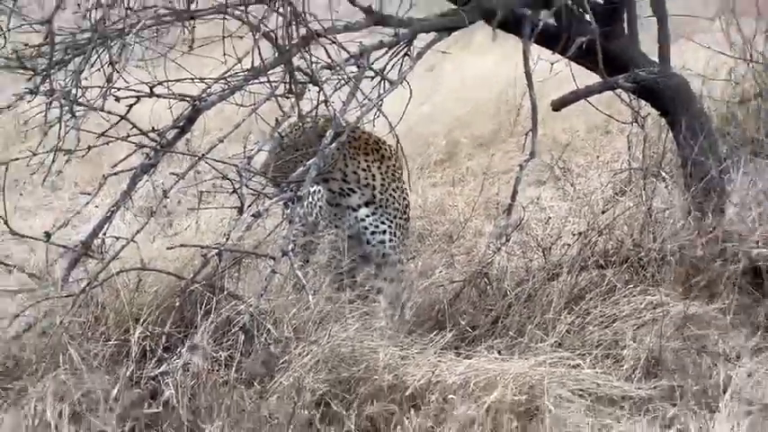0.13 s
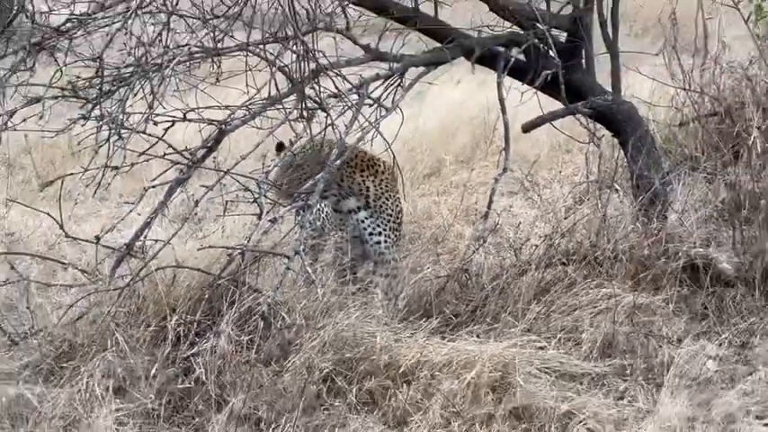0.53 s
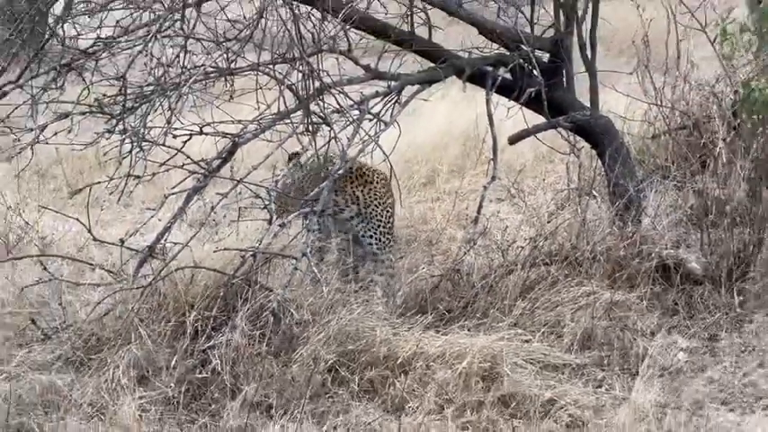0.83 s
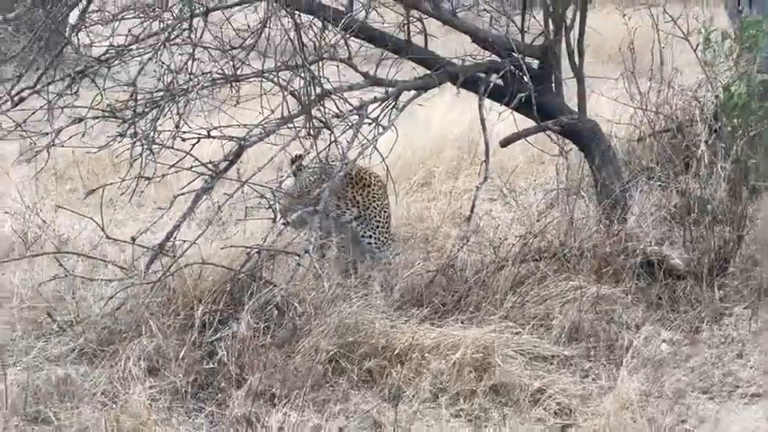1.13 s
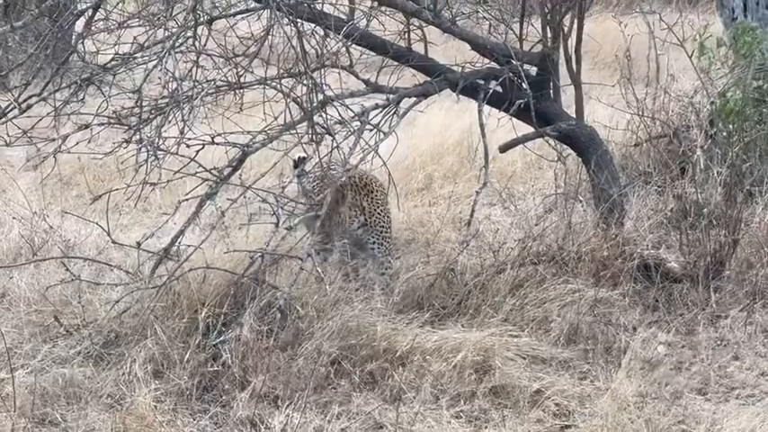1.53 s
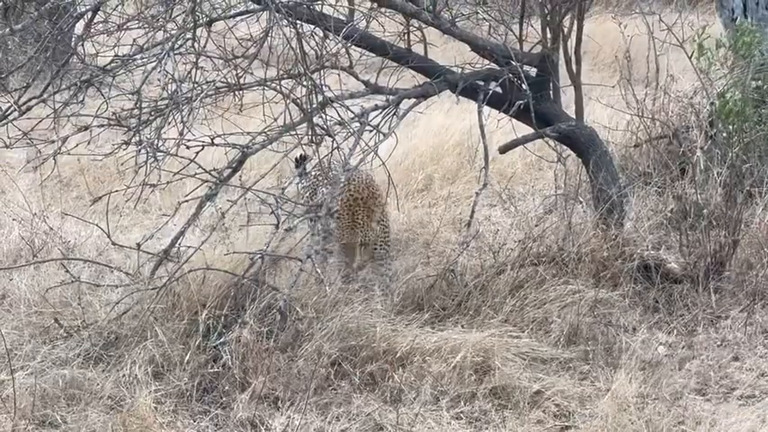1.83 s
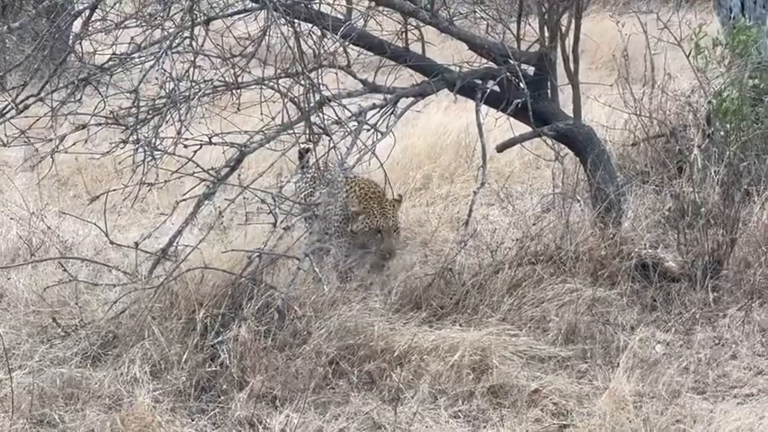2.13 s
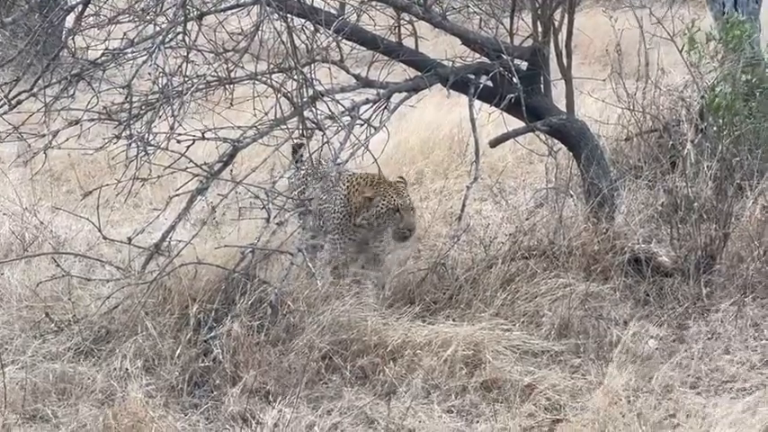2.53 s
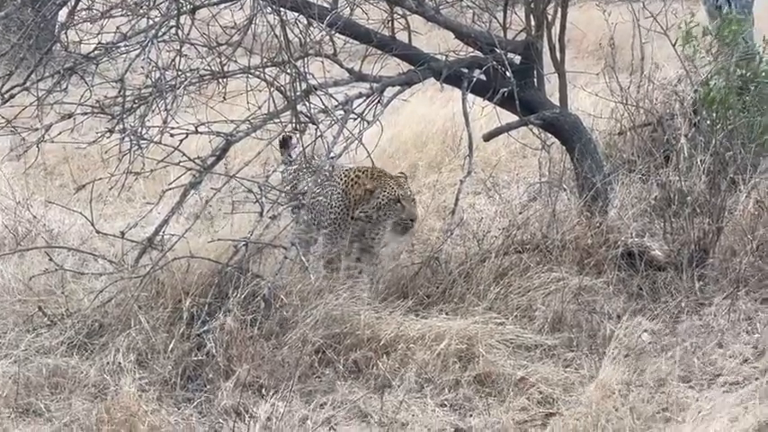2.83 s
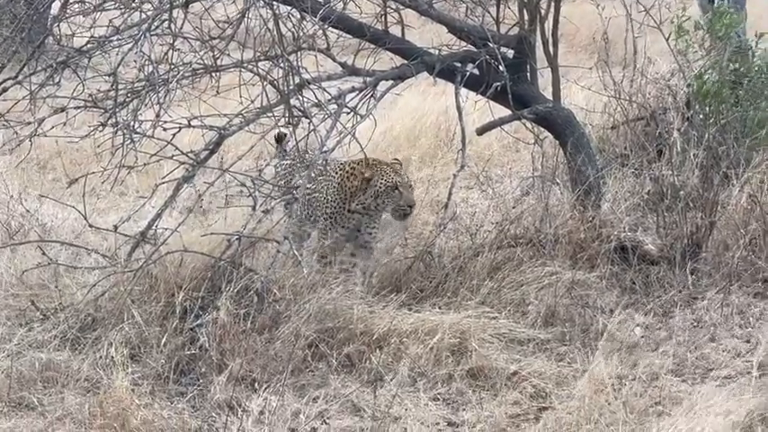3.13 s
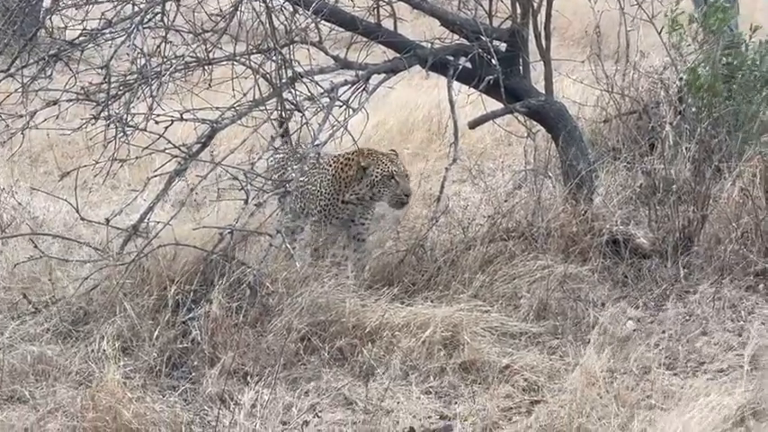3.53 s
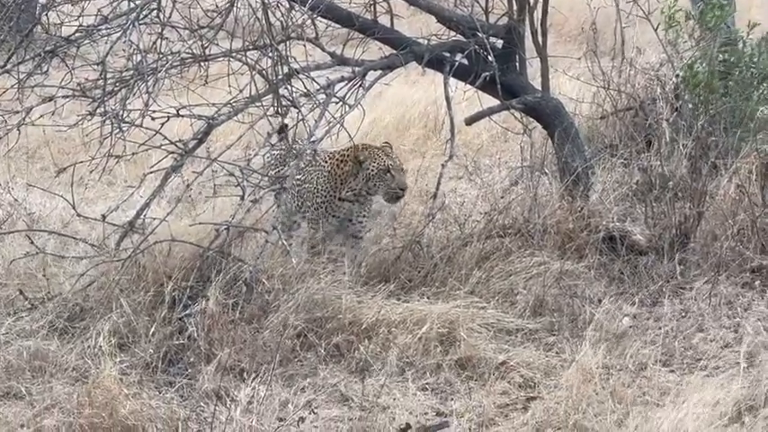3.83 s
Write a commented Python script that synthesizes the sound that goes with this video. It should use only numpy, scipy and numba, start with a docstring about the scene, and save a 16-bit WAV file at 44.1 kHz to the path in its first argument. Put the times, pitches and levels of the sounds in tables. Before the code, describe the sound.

A leopard gives a low grunt, then five harsh sawing rasps, each led in by a quieter rattling inhale. Wind rumbles on the microphone in quiet open bush and buffets it hard at the end.

```python
"""Leopard sawing in dry open bush

An opening grunt is followed by five harsh outward rasps, each led in by a slow rattling in-stroke.
Every stroke is a train of larynx flaps: a flap rings the deep throat cavity, thumps the chest and
lets a puff of air through the resonances of the mouth. Faint air and brushes of dry grass lie behind.
Wind rumbles on the microphone and buffets it hard in the last half second."""
import sys
import numpy as np
from scipy import signal
from scipy.fft import rfft, irfft
from scipy.io import wavfile
from scipy.ndimage import uniform_filter1d
from numba import njit

SR = 44100
rng = np.random.default_rng(int(sys.argv[2]) if len(sys.argv) > 2 else 0)


def wav_record(signal):
    """Record a signal, one row per channel, as 16-bit PCM in the file named by sys.argv[1]."""
    frames = np.transpose(np.atleast_2d(signal))
    bounded = np.clip(frames, -1, 1)
    # unit amplitude maps onto the largest positive 16-bit level
    quanta = np.round(bounded * 32767).astype(np.int16)
    wavfile.write(sys.argv[1], SR, quanta)


N = 176400
TIME = np.arange(N) / SR
BIN_HZ = np.arange(N // 2 + 1) * SR / N


def from_db(db):
    """Amplitude ratio of a level: a factor of ten for every 20 dB."""
    return 10 ** (np.asarray(db) / 20)


def unit_rms(x):
    """Normalisation to unit mean power."""
    return x / np.sqrt(np.mean(x ** 2) + 1e-20)


def colour(x, spectrum):
    """Spectral shaping by (f/Hz, level/dB) points, conserving the power of white noise."""
    hz, db = np.transpose(spectrum)
    gain = from_db(np.interp(np.log(BIN_HZ + 1e-3), np.log(hz), db))
    return irfft(rfft(x) * unit_rms(gain), N)


def stereo_noise(spectrum, side_db):
    """Partial coherence: the channels share one noise and carry a weaker one in antiphase."""
    mid, side = colour(rng.standard_normal((2, N)), spectrum)
    return mid + from_db(side_db) * side * [[1], [-1]]


def grassland():
    """Ambient noise: faint steady air, and the friction of dry grass in brief Gaussian swells."""
    # spectra of the air and of brushed grass: f/Hz, level/dB
    air = [(100, -5), (160, -1.5), (330, -1), (620, -2), (1300, -5), (2000, -5.5), (3200, -18.5),
           (5000, -25.5), (8400, -30.5), (11000, -47), (15000, -43.5)]
    grass = [(1000, -18), (3500, -4.5), (5800, 3.5), (7500, -5.5), (8700, -1.5), (11000, -24.5),
             (15000, -16.5)]
    # brushes of the grass: t/s, standard width/s, level/dB
    rustles = [(.05, 0.065, -67.5), (0.918, 0.013, -64.5), (1.412, 0.031, -68), (2.468, 0.046, -65.5),
               (3.021, 0.028, -63.5)]
    brushes = sum(from_db(db) * np.exp(-((TIME - at) / width) ** 2 / 2) for at, width, db in rustles)
    return from_db(-59) * stereo_noise(air, side_db=-2.5) + brushes * stereo_noise(grass, side_db=-14.5)


def eddies(spectrum, window):
    """Turbulent pressure: coloured noise, its power evened over a window given in samples."""
    noise = stereo_noise(spectrum, side_db=-14)
    return noise / np.sqrt(uniform_filter1d(np.mean(noise ** 2, axis=0), size=window))


def buffet(at, db, fall_s, rise_s=0.00048):
    """Envelope of a pressure transient: fast exponential growth, slower exponential decay."""
    return from_db(db) * np.exp(-np.logaddexp((at - TIME) / rise_s, (TIME - at) / fall_s))


def wind():
    """Turbulence at the microphone: rumble and flutter follow the gusts; hard buffets saturate softly."""
    # course of the gusts: t/s, level/dB
    gusts = [(0.0, -46), (0.04, -46.5), (0.13, -61), (0.7, -44.5), (0.72, -63), (1.29, -36), (1.37, -44),
             (1.84, -32), (1.94, -46), (2.08, -42), (2.26, -38.5), (2.31, -36.5), (2.42, -41.5),
             (2.65, -26), (2.7, -40), (2.87, -32), (3.03, -41), (3.4, -36.5), (3.55, -23), (3.59, -14.5),
             (3.78, -19), (3.81, -36), (3.85, -15.5), (3.9, -28.5), (3.93, -15.5), (4.0, -21.5)]
    # hard buffets: t/s, thud level/dB, slap level/dB
    buffets = [(3.583, -10, -29.5), (3.608, -7.5, -5), (3.638, -10, -14.5), (3.663, -15, -23.5),
               (3.674, -10.5, -11), (3.708, -9, -16.5), (3.741, -6, -20.5), (3.783, -16.5, -20),
               (3.796, -3.5, -22.5), (3.817, -4.5, -11), (3.86, -5, -9), (3.913, -9, -11),
               (3.926, -19.5, -18), (3.961, -1.5, -18)]
    # spectra of the low rumble, the higher flutter and a buffet's thud and slap: f/Hz, level/dB
    rumble_spectrum = [(20, -30), (30, -13), (40, -11.5), (52, -4), (90, -1), (140, -14), (220, -30.5),
                       (500, -47.5), (1000, -76)]
    flutter_spectrum = [(60, -10), (130, 9.5), (220, 2.5), (450, -8.5), (1000, -39.5), (2500, -73.5)]
    thud_spectrum = [(40, -12.5), (120, 4.5), (220, -3), (400, -7.5), (800, -34.5), (2000, -67)]
    slap_spectrum = [(150, -24.5), (300, 5), (480, 12.5), (700, -3), (1000, -9.5), (1400, -42), (2000, -37),
                     (2800, -72.5), (6000, -63.5)]
    thud_fall_s, slap_fall_s = 0.014, 0.0075
    gust_db = np.interp(TIME, *np.transpose(gusts))
    rumble = eddies(rumble_spectrum, window=2000) * from_db(gust_db + 3.5)
    flutter = eddies(flutter_spectrum, window=1200) * from_db(0.97 * gust_db - 5.5)
    thud_envelope = sum(buffet(at, db, thud_fall_s) for at, db, _ in buffets)
    slap_envelope = sum(buffet(at, db, slap_fall_s) for at, _, db in buffets)
    slap_envelope += buffet(at=0.609, db=-39.5, fall_s=slap_fall_s)  # a soft bump before the grunt
    thuds = eddies(thud_spectrum, window=600) * thud_envelope
    slaps = eddies(slap_spectrum, window=300) * slap_envelope
    port_low_cut = signal.butter(2, 34.5, "high", fs=SR, output="sos")
    pressure = signal.sosfilt(port_low_cut, rumble + flutter + thuds + slaps)
    overloaded = 1.1 * np.tanh(pressure / 1.1)
    return signal.sosfilt(signal.butter(2, 2500, fs=SR, output="sos"), overloaded)


def bush(x, tail_db=-16, t60_s=0.18, balance_db=0.6):
    """Scattering by trunks and grass adds a short dull tail; a phase difference spreads the treble."""
    # side signal relative to the mid signal: f/Hz, level/dB
    spread = [(100, -9), (500, -19.5), (1200, -12.5), (2500, -9), (4500, -22.5), (6500, -13), (8500, 0),
              (15000, -1)]
    t = TIME[:SR // 2]
    scatter = rng.standard_normal(len(t)) * from_db(-60 * t / t60_s) * (t > 0.008)
    scatter = signal.sosfilt(signal.butter(1, 11000, fs=SR, output="sos"), scatter)
    mid = x + from_db(tail_db) * signal.fftconvolve(x, scatter / np.sqrt(np.sum(scatter ** 2)))[:N]
    side_gain = from_db(np.interp(BIN_HZ, *np.transpose(spread)))
    side = irfft(1j * rfft(mid) * side_gain, N)  # in quadrature with the mid signal
    return np.array([mid + side, mid - side]) * from_db([[balance_db / 2], [-balance_db / 2]])


@njit
def moving_resonance(x, angle, r):
    """Two-pole resonator of unit peak gain, with pole radius r and a moving centre in rad/sample."""
    y = np.zeros(len(x))
    for i in range(2, len(x)):
        drive = (1 - r * r) / 2 * (x[i] - x[i - 2])
        y[i] = drive + 2 * r * np.cos(angle[i]) * y[i - 1] - r * r * y[i - 2] + 1e-18
    return y


def formants(x, modes, tuning):
    """Parallel resonances of alternating sign glide together, roughly conserving white-noise power."""
    total, power = 0, 0
    for k, (hz, bandwidth, db) in enumerate(modes):
        r = np.exp(-np.pi * bandwidth / SR)
        total = total + (-1) ** k * from_db(db) * moving_resonance(x, 2 * np.pi * hz * tuning / SR, r)
        power += from_db(db) ** 2 * (1 - r)
    return total / np.sqrt(power)


def swell(t, peak_s):
    """Critically damped pulse: it rises to 1 at peak_s, then dies away."""
    u = np.maximum(t, 0) / peak_s
    return u * np.exp(1 - u)


def ring(t, hz, peak_s):
    """Damped oscillation of a struck resonator, strongest at peak_s."""
    return swell(t, peak_s) * np.sin(2 * np.pi * hz * t)


def strokes(rows, shape, mouth, ring_s, puff_s, leak, snap, jitter_s, uneven_db, quicken, low_cut_hz):
    """Source and filter: larynx flaps ring throat and chest and pulse the air that excites the mouth."""
    # resonances of the open mouth and of the gap between tongue and teeth: f/Hz, bandwidth/Hz, level/dB
    open_mouth = [(855, 30, 2), (1011, 51, -0.5)]
    teeth = [(2365, 150, 5), (2840, 59, 8), (3188, 280, -0.5), (4200, 60, 6.5), (4785, 59, -8),
             (5280, 110, 4), (5904, 180, -6.5), (6550, 100, -0.5), (8230, 310, -5), (9770, 250, -4.5)]
    # spectrum of the breath hiss: f/Hz, level/dB
    hiss_spectrum = [(300, -11), (1300, 8), (3300, -2), (3700, 4.5), (5100, 15), (6600, 0.5), (7400, -7.5),
                     (8300, -7.5), (9700, -6.5), (11000, -59.5), (13000, -0.5), (16000, -12.5)]
    share, cavity_db, air_db, pitch_ratio = np.transpose(shape)
    voice, breath = np.zeros((2, N))
    band = signal.butter(2, [low_cut_hz, 3600], "band", fs=SR, output="sos")
    for start, length, rate, hz, tuning, level_db, rasp_db, open_db, hiss_db in rows:
        near = (TIME > start - 0.05) & (TIME < start + length + 0.08)
        t = TIME[near] - start
        puffs, snaps = np.zeros((2, len(t)))
        for k, (late, size, force, detune) in enumerate(rng.standard_normal((24, 4))):
            progress = k / rate / length
            if progress > 1:
                break
            # the flaps crowd closer as the stroke goes on
            at = length * progress * (1 + quicken * (1 - progress)) + jitter_s * late
            pitch = hz * np.interp(at / length, share, pitch_ratio) * (1 + 0.026 * detune)
            gain = from_db(level_db + np.interp(at / length, share, cavity_db) + uneven_db * size / 2)
            chest = from_db(-19.5) * ring(t - at, hz=90.4, peak_s=0.0095)
            voice[near] += gain * (ring(t - at, pitch, ring_s) + chest)
            push = from_db(uneven_db * force)
            puffs += push * swell(t - at, puff_s)
            snaps[np.searchsorted(t, at)] += push
        gate = np.clip(np.minimum(t, length - t) / 0.022 + 1, 0, 1)
        flow = gate * from_db(np.interp(t / length, share, air_db))
        glide = np.interp(t / length, share, pitch_ratio)
        # the resonances follow only a small share of the cavity's glide
        mouth_tuning, open_tuning = tuning * glide ** 0.01, tuning * glide ** 0.21
        larynx_noise, hiss_noise = rng.standard_normal((2, N))[:, near]
        pulsed_air = unit_rms(unit_rms(puffs) + leak) * larynx_noise  # air also leaks between flaps
        source = flow * unit_rms(pulsed_air + snap * unit_rms(snaps))
        hiss = from_db(hiss_db) * flow * unit_rms(unit_rms(puffs) + 1.8) * hiss_noise
        rasp = from_db(rasp_db) * formants(source, mouth, mouth_tuning)
        rasp += from_db(open_db) * formants(source, open_mouth, open_tuning)
        voice[near] += signal.sosfilt(band, rasp) + from_db(-2.5) * formants(hiss, teeth, mouth_tuning)
        breath[near] += hiss
    return voice + from_db(-8.5) * colour(breath, hiss_spectrum)


def leopard():
    """Flow-driven vibration: after a grunt, the larynx flaps fast breathing out and slowly breathing in."""
    # strokes: t/s, length/s, flap rate/Hz, cavity f/Hz, mouth tuning ratio,
    # cavity level/dB, rasp level/dB, open-mouth level/dB, hiss level/dB
    grunts = [(.683, .2, 42, 167, 1.0, -20, -37.5, -41, -56)]
    rasps = [(1.145, 0.21, 64, 249.7, 1.0, -12, -25, -25, -41.5),
             (1.661, 0.22, 56.4, 231, 1.04, -13, -28, -38.5, -46),
             (2.18, 0.23, 57, 241.6, 1.003, -10.5, -26.5, -30, -41.5),
             (2.737, .23, 60, 238, .995, -10.5, -26, -28.5, -40.5),
             (3.29, 0.23, 53, 216, 0.97, -12, -27.5, -27.5, -43)]
    in_strokes = [(.977, .128, 43, 163.5, 1.0, -17.5, -45.5, -52, -64),
                  (1.415, 0.21, 31.43, 153, 1.056, -20, -50.5, -65.5, -74.5),
                  (1.962, 0.19, 31.9, 163.6, 1.02, -18.5, -47.5, -59.5, -67.5),
                  (2.50, .205, 35.34, 172.4, .99, -21, -47, -55.5, -60.5),
                  (3.052, 0.21, 32.74, 171, 0.98, -19.5, -46, -52, -64)]
    # course of each kind of stroke: share of its length, cavity level/dB, air level/dB, pitch ratio
    grunt_shape = [(0, -17, -13, .9), (.075, -12, -9, .95), (.12, -7, 2, .97), (.28, -3, -3, 1.0),
                   (.42, 0, -17, 1.02), (.76, 1, -17, 1.0), (1.0, -14, -25, .95)]
    rasp_shape = [(0, -15.5, -20, .8), (0.082, -4.5, -10.5, 0.96), (0.162, 3, -3, .92),
                  (.42, 3.5, -0.5, 1.0), (0.722, -3.5, -4, 0.72), (.88, -2.5, -10.5, .82),
                  (0.999, -18.5, -22.5, .77)]
    in_shape = [(0, -8.5, -6.5, 1.1), (.3, -1, -3.5, 1.05), (.6, -0.5, 4, 1.0), (.82, 5.5, 6.5, .97),
                (0.999, -7.5, -21.5, 1.1)]
    # mouth resonances breathing out and breathing in: f/Hz, bandwidth/Hz, level/dB
    mouth_out = [(701, 99.5, 1.5), (835.2, 87, 0.5), (1167, 43, -3), (1467.6, 40, -2), (1699, 48, -5),
                 (1998, 51, -8.5), (2407, 130, -17.5), (2598, 83, -16.5)]
    mouth_in = [(334, 28.5, 10.5), (608, 31, 2.5), (1089, 34, 3), (1570, 40, -7), (1786, 86, -7.5),
                (1954, 100, -14.5), (2495, 130, -11.5), (2810, 410, -19)]
    grunt = strokes(grunts, grunt_shape, mouth_out, ring_s=0.0062, puff_s=0.002, leak=1.0, snap=0.27,
                    jitter_s=0.00041, uneven_db=-3.5, quicken=0.029, low_cut_hz=300)
    outward = strokes(rasps, rasp_shape, mouth_out, ring_s=0.0048, puff_s=0.0014, leak=1.0, snap=0.3,
                      jitter_s=0.00077, uneven_db=3.0, quicken=0.05167, low_cut_hz=224)
    inward = strokes(in_strokes, in_shape, mouth_in, ring_s=0.0039, puff_s=0.0057, leak=1.1, snap=0.43,
                     jitter_s=0.001, uneven_db=3.0, quicken=0.25, low_cut_hz=92)
    return grunt + outward + inward


def scene():
    """Superposition of the leopard in the bush, the wind and the quiet grassland."""
    return bush(leopard()) + wind() + grassland()


def record(dry):
    """Band limiting: a steep elliptic low-pass removes the treble above 15.8 kHz."""
    return signal.sosfilt(signal.ellip(10, 0.1, 80, 15800, fs=SR, output="sos"), dry)


dry = scene()
out = record(dry)
wav_record(out)
```